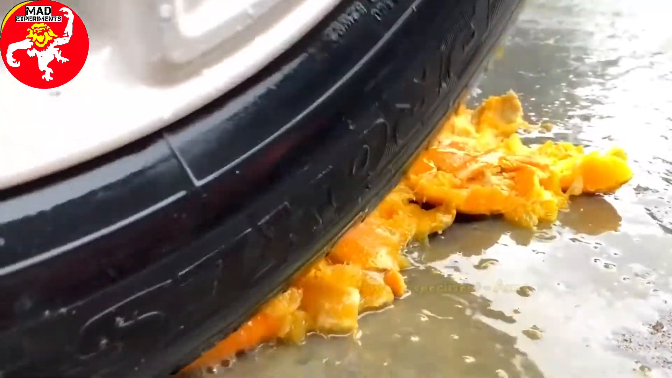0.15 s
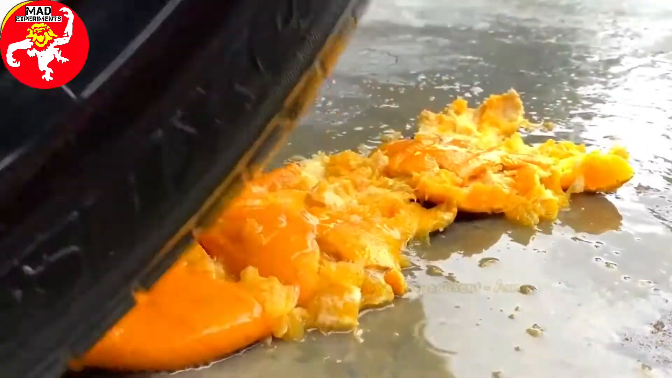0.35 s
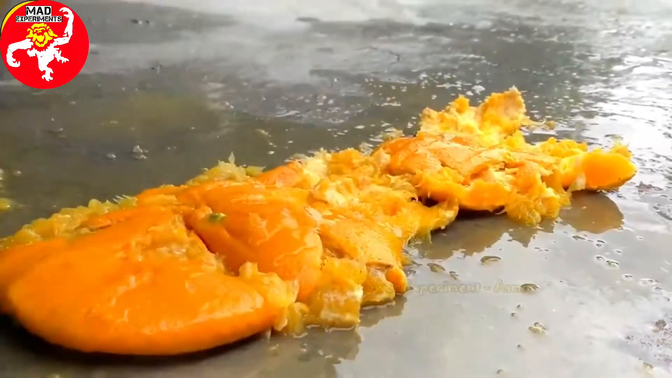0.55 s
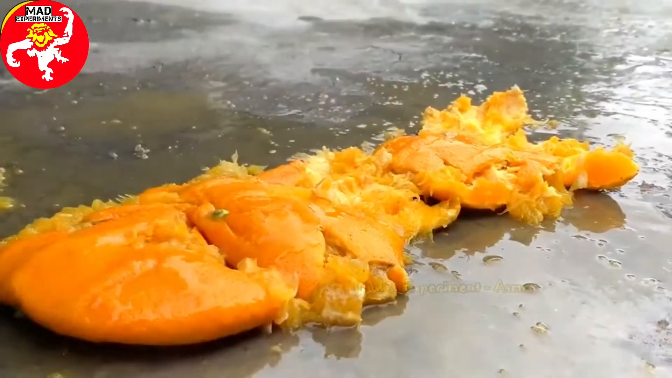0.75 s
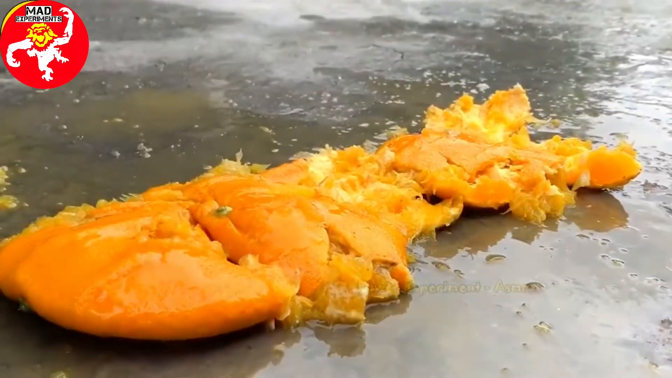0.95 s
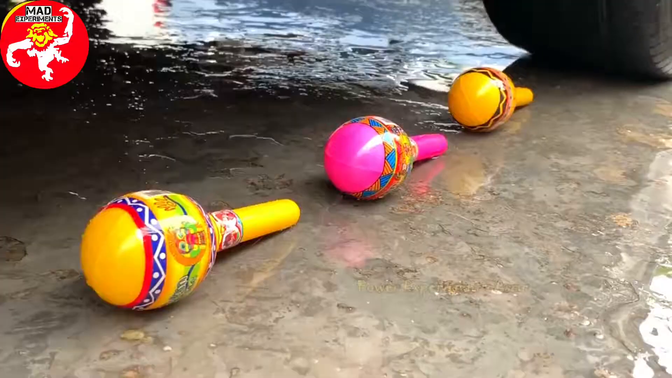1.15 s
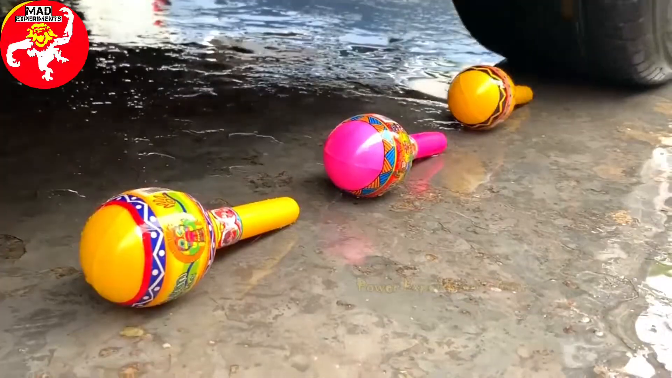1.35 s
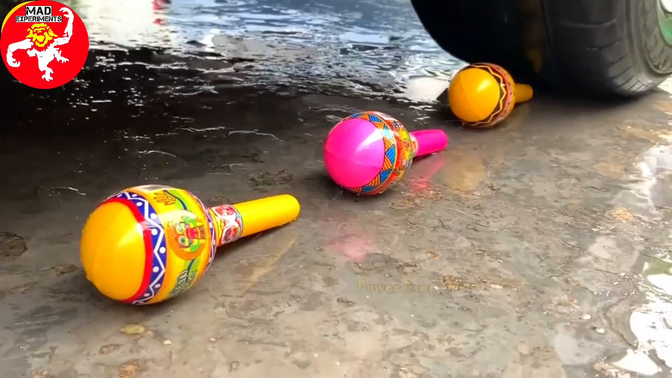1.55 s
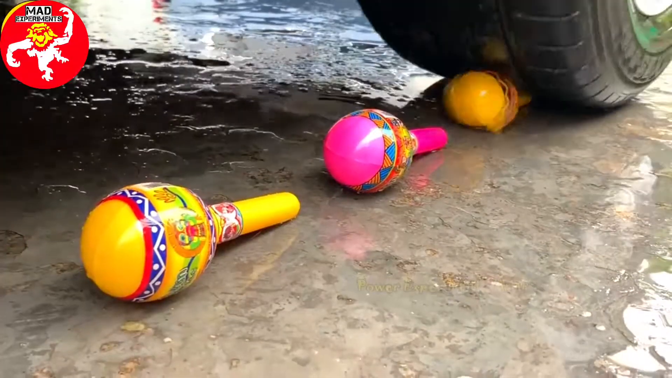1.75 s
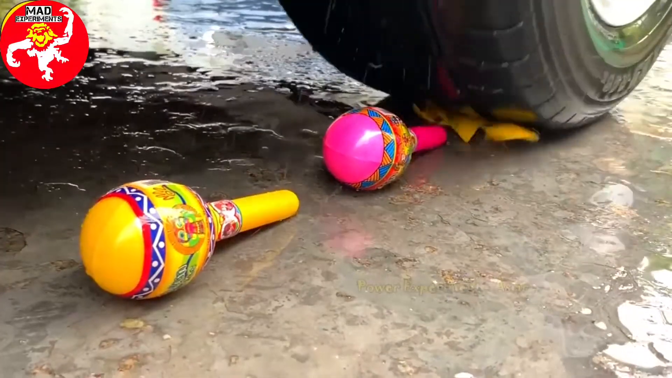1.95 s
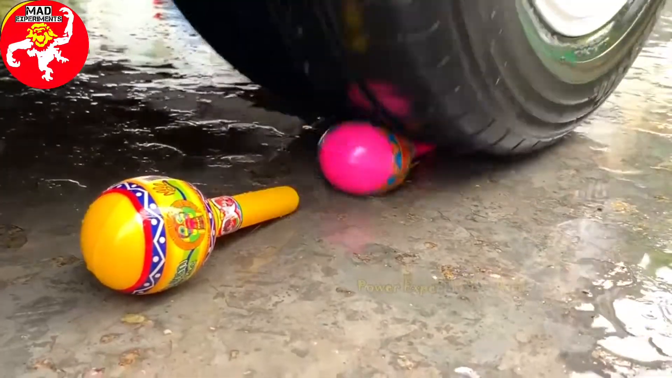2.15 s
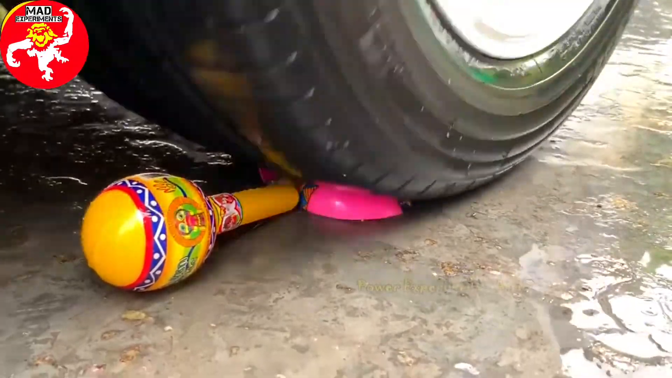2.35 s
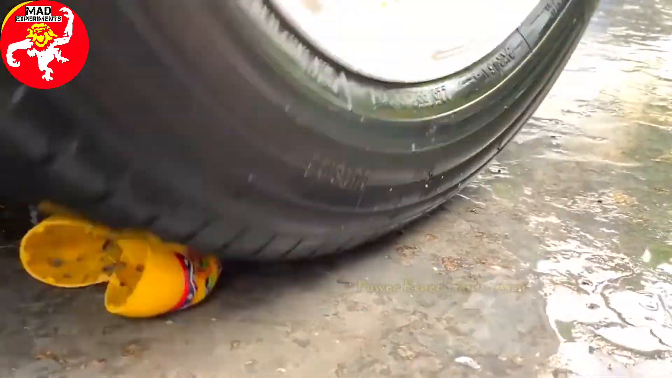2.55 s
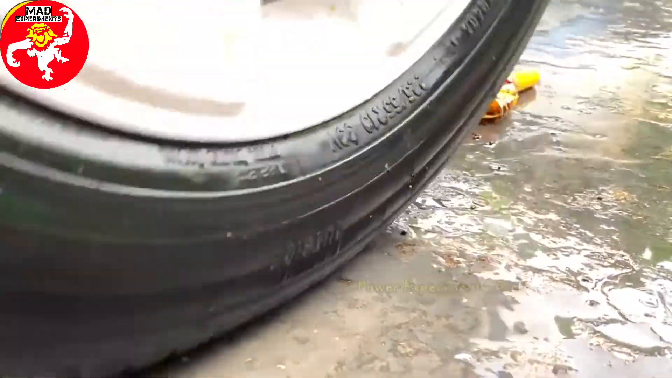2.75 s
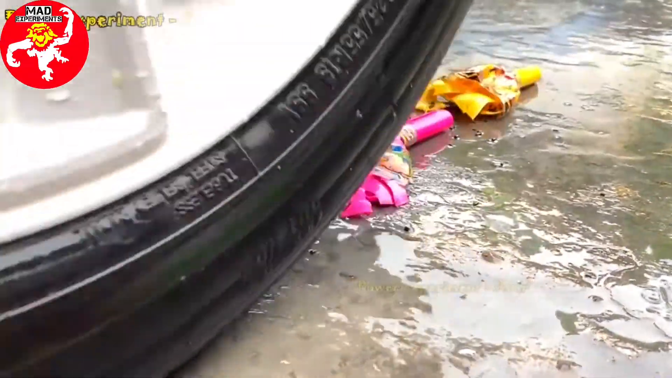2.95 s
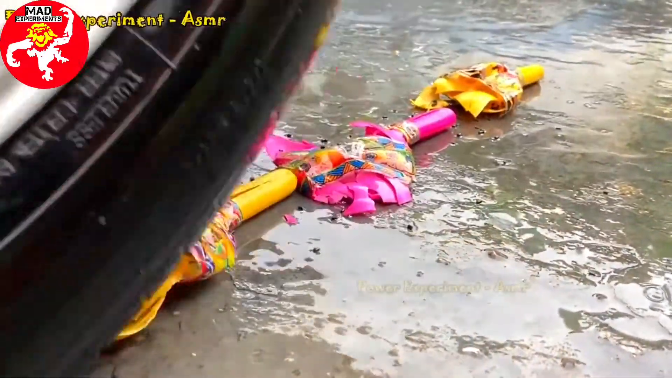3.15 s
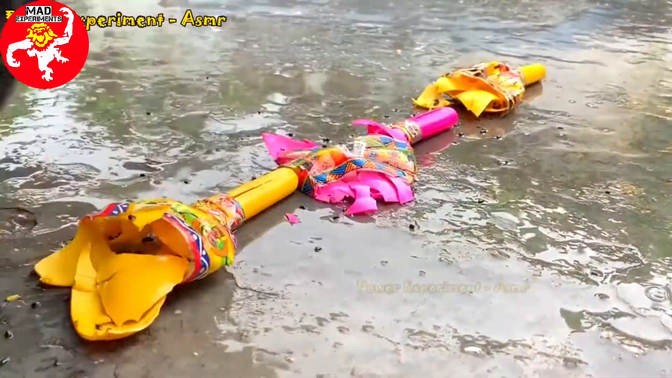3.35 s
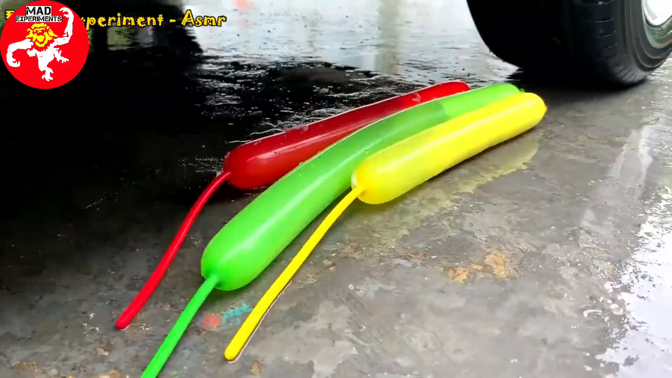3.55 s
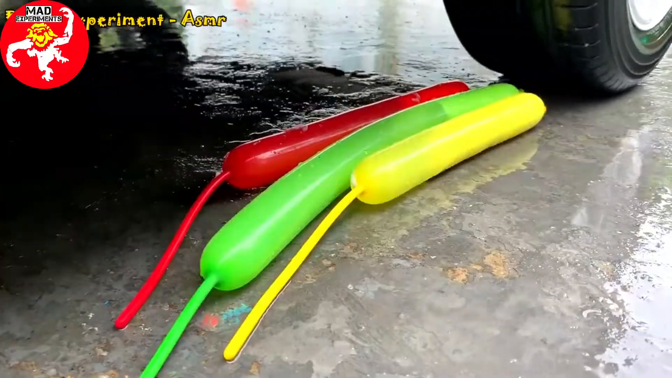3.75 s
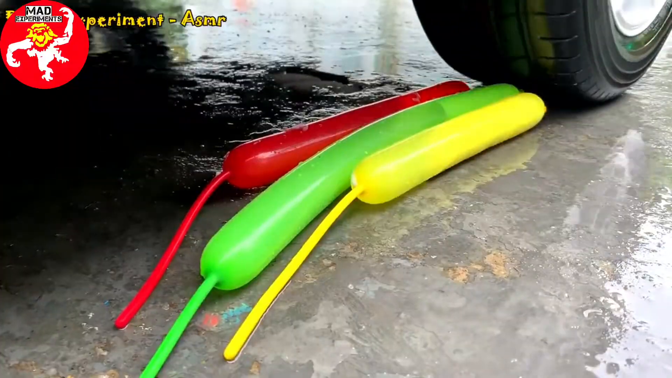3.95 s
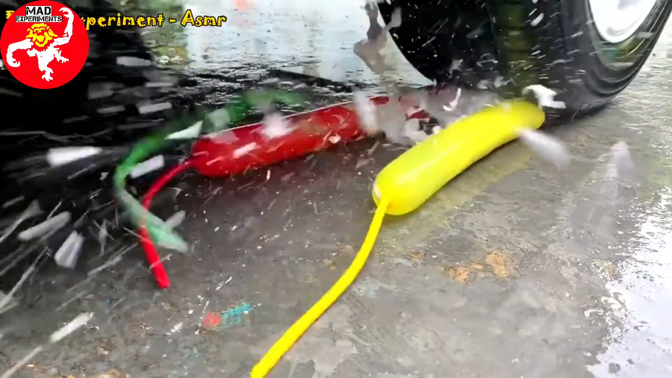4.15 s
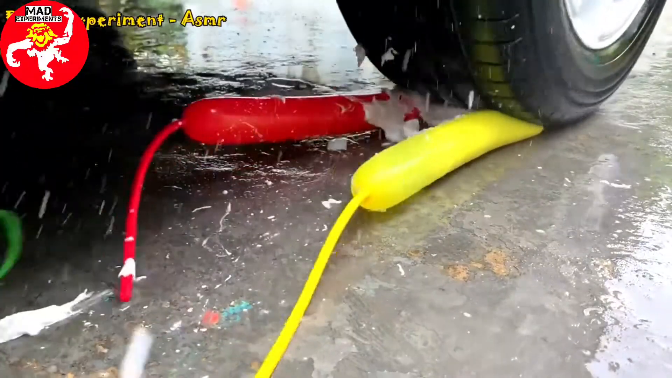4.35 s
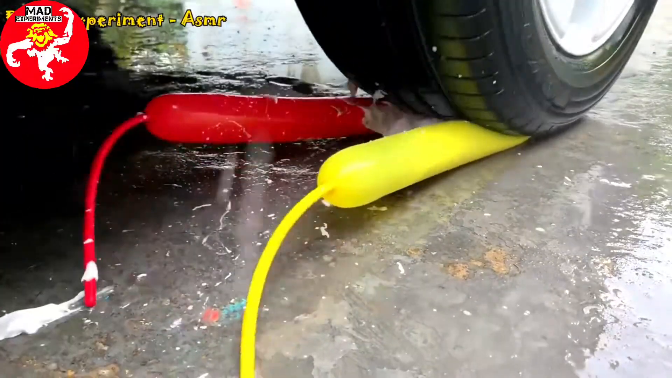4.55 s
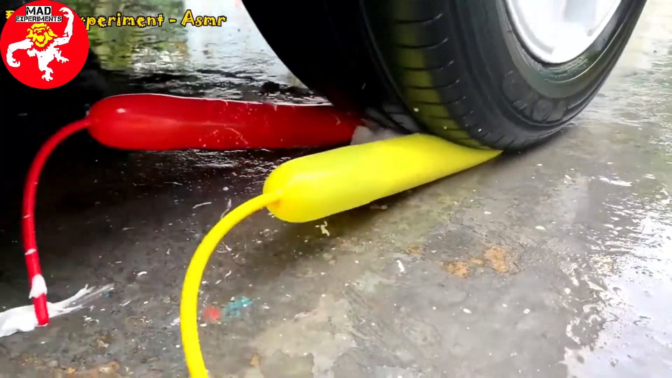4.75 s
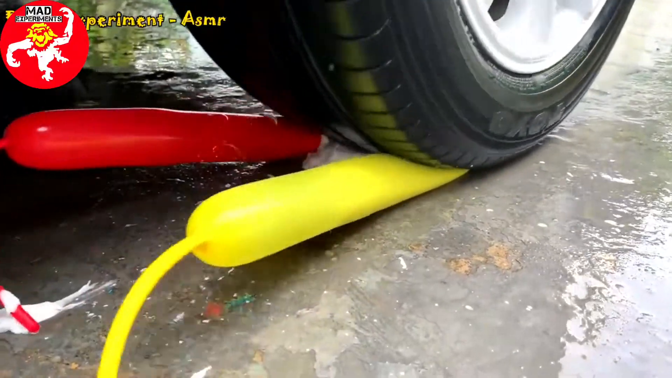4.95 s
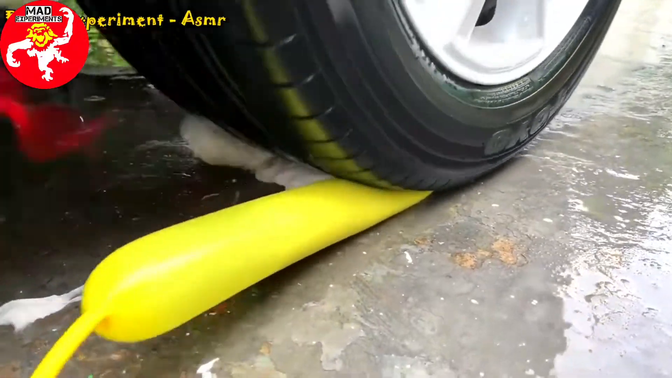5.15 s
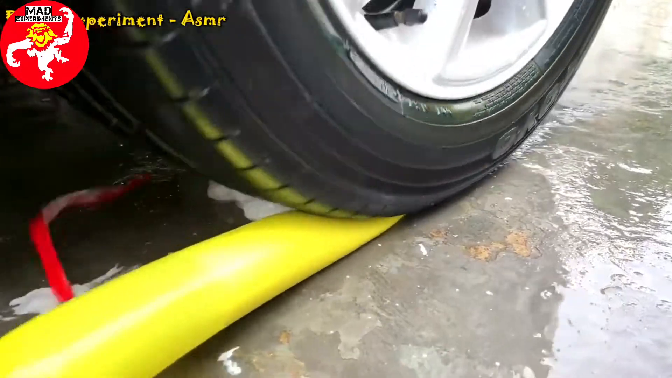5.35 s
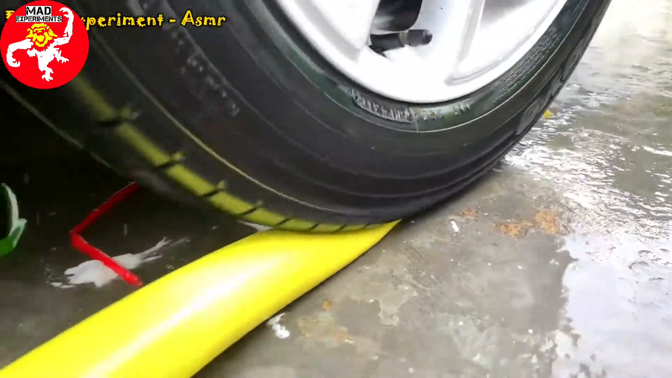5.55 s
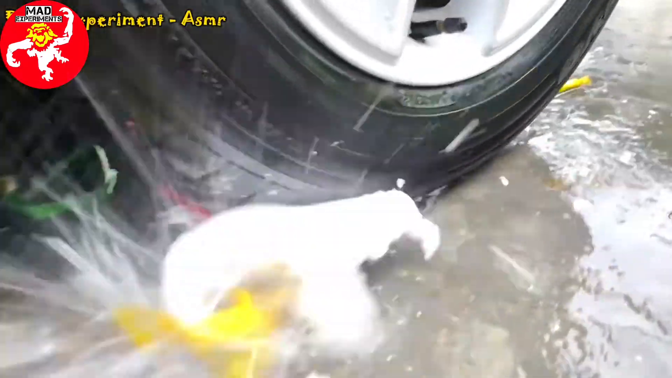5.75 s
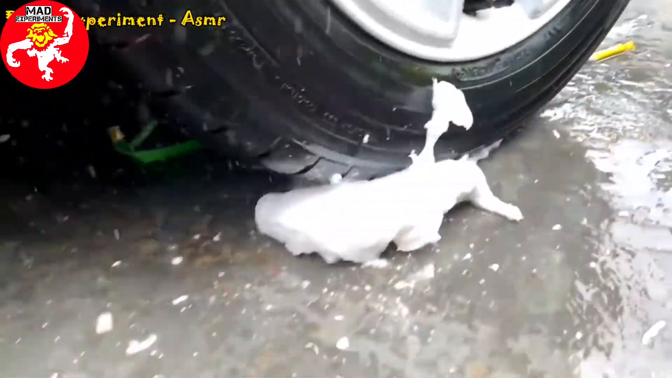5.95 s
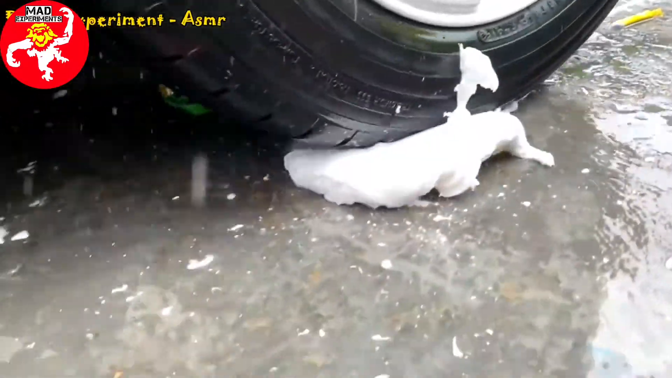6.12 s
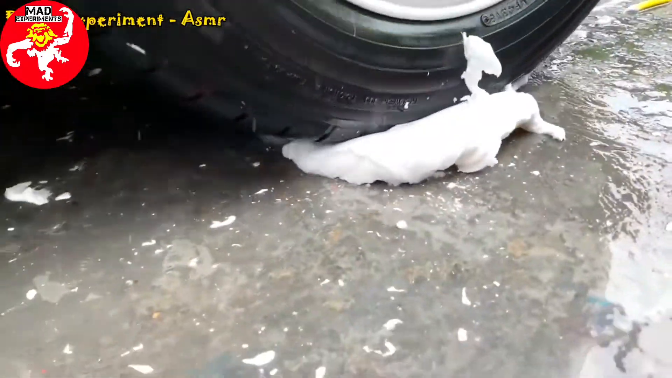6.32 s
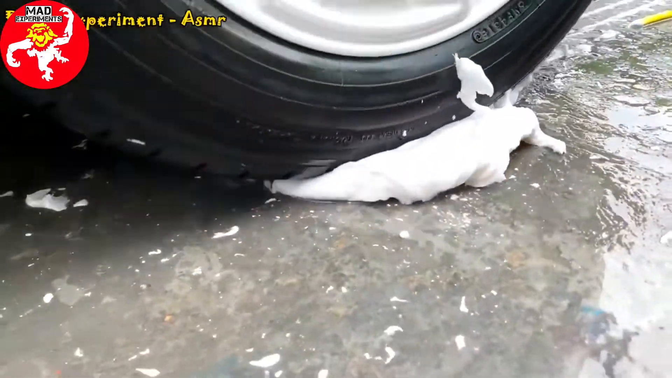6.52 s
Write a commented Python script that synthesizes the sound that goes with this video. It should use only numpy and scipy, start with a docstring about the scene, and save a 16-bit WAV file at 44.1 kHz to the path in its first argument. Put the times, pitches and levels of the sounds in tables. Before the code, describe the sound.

An idling car rolls over things: a wet squelch, then plastic maracas cracking and crunching, then three sharp balloon bursts.

```python
"""Car creeping over an orange, maracas and balloons

A wet concrete yard, a stereo microphone close to the tyre of an idling car. Beside the exhaust the
tread squashes an orange, which squirts and crackles. Then, with the engine heard from in front,
three plastic maracas crack, splinter and ring, and three foam-filled balloons tear, whoop and spray.
The cracks and bursts reflect off the underbody and echo faintly round the yard."""
import sys
import numpy as np
from scipy import signal
from scipy.fft import rfft, irfft, next_fast_len
from scipy.io import wavfile
from scipy.ndimage import uniform_filter1d

SR = 44100
rng = np.random.default_rng(int(sys.argv[2]) if len(sys.argv) > 2 else 0)


def unload_audio(sound):
    """Save the sound as a 16-bit wav file, at the path given as the first command line argument."""
    columns = np.transpose(np.atleast_2d(sound))
    # keep every value between -1 and 1, then stretch to whole-number steps
    steps = np.round(np.clip(columns, -1, 1) * 32767)
    wavfile.write(sys.argv[1], SR, steps.astype(np.int16))


N = 294588
TIME = np.arange(N) / SR
LEAVES_EXHAUST_S = 1.215  # the microphone is beside the tailpipe until here
CRACK_PAN_DB, SHELL_PAN_DB = -1.5, 1.2  # left minus right

# Spectrum of cracking plastic: (frequency [Hz], relative level [dB])
CRACK_SPECTRUM = [(300, -26.5), (900, -9.5), (1700, -4), (2800, 3.5), (4400, 4), (6500, 0.5), (9500, 2),
                  (13500, -3.5), (15500, -24.5)]
# Spectrum of a knock on the hollow shell: (frequency [Hz], relative level [dB])
SHELL_SPECTRUM = [(80, -20.5), (200, -1), (420, -5), (750, 0.5), (1100, -0.5), (1600, -5.5), (3000, -15.5)]
# The tyre bearing down on each maraca: (start [s], end [s], relative splinter level [dB])
MARACA_CRUSHES = [(1.768, 2.04, -21.5), (2.214, 2.384, -20.5), (2.44, 2.729, -16.5)]
# Balloon bursts: (time [s], left minus right [dB], send to the yard [dB], foam [dB], hum change [dB])
BALLOON_BURSTS = [(4.14, -1.4, -28.5, -53.5, -25.5), (5.2, -2.8, -25, -42.5, -3),
                  (5.84, 2, -19.5, -41.5, 1)]


def maraca_snaps(crack_db=-6, knock_db=1, ring_db=2, crazing_db=-9, size=4096):
    """The plastic crazes under strain, a crack runs through it, and the hollow shell rings briefly."""
    # Main snaps: (time [s], relative crack level [dB], relative shell level [dB], shell pitch [Hz])
    main_snaps = [(1.782, 0.5, -14.5, 637), (1.7935, -2, -26.5, 1110), (1.8065, -2, -23.5, 1180),
                  (1.8205, 0.5, -25.5, 1080), (1.8359, 0, -18.5, 493), (1.8424, -3.5, -4, 1052),
                  (1.8648, -0.5, -24, 1110), (1.889, -9.5, -28, 1120), (1.901, -6, -24.5, 1090),
                  (1.934, -6.5, -19, 1330), (1.9605, 2.5, -6.5, 1187), (2, -3, -22, 394),
                  (2.0296, -2.5, -20.5, 1160), (2.072, -18, -22, 656), (2.1466, -3, -5, 616),
                  (2.2087, 0.5, -5.5, 794), (2.2114, -2, -15.5, 590), (2.2298, -1, -20.5, 1110),
                  (2.2376, -9, -16.5, 550), (2.26, -4, -12.5, 904), (2.2677, -2, -7.5, 687),
                  (2.3144, 3, -12, 876), (2.3487, -4, -26, 1080), (2.3708, 3, -10, 1120),
                  (2.4074, -7.5, -18.5, 1370), (2.4166, -5.5, -17, 1090), (2.456, -2, -15, 427),
                  (2.4745, -3, -14, 428), (2.5325, -4.5, -16.5, 1360), (2.543, 1, -11.5, 775),
                  (2.561, -10.5, -20.5, 1120), (2.583, -4.5, -20.5, 1100), (2.616, 6, -9.5, 1097),
                  (2.6499, 4.5, -8, 1150), (2.675, -2.5, -25.5, 790), (2.6978, 1, -16.5, 850),
                  (2.7085, 2.5, -17.5, 1410), (2.7338, -2.5, -22.5, 690), (2.7699, -12.5, -18, 630),
                  (2.7762, -7.5, -28, 440), (2.7914, -7.5, -18.5, 435), (2.8283, -4.5, -10, 447),
                  (2.8623, -6.5, -21.5, 457), (2.888, -10, -17.5, 1080), (2.934, -15.5, -39, 387)]
    lead_s, rise_s, craze_s = .012, .0008, .005
    out, clock = np.zeros((2, N)), np.arange(size) / SR - lead_s
    t = np.maximum(clock, 0)
    crazing = np.exp(-abs(clock - rise_s) / craze_s) * np.minimum(1 + clock / lead_s, 1)
    shape = np.maximum(strike(t, rise_s=.00089, decay_s=.003), amp(crazing_db) * crazing)
    for s, split_db, shell_db, hz in main_snaps + small_snaps():
        crack = amp(split_db + crack_db) * shape * noise(CRACK_SPECTRUM, size, 1.5, ripple_hz=376.3)
        hollow = noise(SHELL_SPECTRUM, size, 1.5, ripple_hz=131)
        knock = amp(shell_db + knock_db) * strike(t, rise_s, decay_s=.005) * hollow
        ring = amp(shell_db + ring_db) * strike(t, rise_s, decay_s=.004) * np.sin(2 * np.pi * hz * t)
        add(out, s - lead_s, pan(CRACK_PAN_DB) * crack + pan(SHELL_PAN_DB) * (knock + ring))
    return out


def small_snaps(count=2, crack_db=-3, shell_db=-19.5, spread_db=4, low_hz=450, high_hz=1400):
    """Rows for a few extra snaps at random moments while each maraca is under the tyre."""
    rows = []
    for start, end, _ in MARACA_CRUSHES:
        for when, weakness, pitch in rng.random((count, 3)):
            loss_db = spread_db * weakness
            hz = low_hz + pitch * (high_hz - low_hz)
            rows.append((start + when * (end - start), crack_db - loss_db, shell_db - loss_db, hz))
    return rows


def splinters(level_db=-1, shell_db=-4):
    """Many tiny fractures of random size between the big snaps."""
    fractures = crackle(per_s=400, spread_db=4.5, decay_s=.0031)
    plastic = noise(CRACK_SPECTRUM, N) + amp(shell_db) * noise(SHELL_SPECTRUM, N)
    return tread_pressure() * amp(level_db) * fractures * plastic


def tread_pressure(bite_s=.005, ease_db_per_s=-18.5, release_s=.006, settle_db=-12.5,
                   settle_db_per_s=-66.5):
    """The tread bites into each maraca, eases as the shell gives way and lets go; the pieces settle."""
    total = np.zeros(N)
    for start, end, db in MARACA_CRUSHES:
        bite = np.clip((TIME - start) / bite_s + 1, 0, 1)
        held, after = np.clip(TIME - start, 0, end - start), np.maximum(TIME - end, 0)
        release = np.maximum(np.exp(-after / release_s), amp(settle_db + settle_db_per_s * after))
        total = np.maximum(total, bite * amp(db + ease_db_per_s * held) * release)
    return total


def ringing(breaks):
    """Tyre cavity and shells ring in sympathy with each break."""
    # The air in the tyre first, then the shells: (frequency [Hz], t60 [s], gain at resonance [dB])
    modes = [(191.3, .3, 12), (404, 0.023, -7.5), (1120, .035, -19.5), (2790, .03, -7.5), (4460, 0.029, -5),
             (6180, 0.0067, -6.5)]
    t = TIME[:SR // 2]
    response = sum(amp(db - 60 * t / t60) * np.cos(2 * np.pi * hz * t) * 2 * np.log(1000) / (t60 * SR)
                   for hz, t60, db in modes)
    return signal.fftconvolve(breaks, response[None], axes=1)[:, :N]


def balloons(release_s=.0023, squeal_db=-2, size=4096):
    """The rubber rips with a swelling rasp, then the wall snaps back and the pitch plunges."""
    # Rubber tearing: (start [s], end [s], final level [dB], rise along the tear [dB], squeal [Hz])
    tears = [(4.118, 4.135, -20.5, 17, 1348), (4.135, 4.142, -11, 9.5, 1237),
             (5.181, 5.187, -21.5, 13, 1877), (5.185, 5.196, -9.5, 10.5, 1825),
             (5.832, 5.849, -20.5, 15.5, 2606)]
    # Rasp of the tear: (frequency [Hz], relative level [dB])
    rip_spectrum = [(100, -28.5), (400, 5), (1750, 0.5), (2500, -11.5), (4000, 0), (6500, -3),
                    (8000, -12.5), (10000, -17), (15000, -26.5)]
    # Walls collapsing: (time [s], level [dB], first pitch [Hz], growth of the period [s/s], swell [s])
    whoops = [(4.1315, -4, 898, 0.36, 0.002), (4.1435, -1, 1536, 0.76, 0.00078),
              (5.187, -18, 1007, 0.23, 0.0047), (5.1977, -2, 2400, 1, 0.0012),
              (5.8424, -2.5, 1293, 0.56, 0.0013)]
    out, t = np.zeros((2, N)), TIME[:size]
    for start, end, db, rise_db, hz in tears:
        length = max(end - start, .002)
        release = np.exp(-np.maximum(t - length, 0) / release_s)
        shape = amp(db + rise_db * np.minimum(t / length - 1, 0)) * release
        slip_hz = hz * (1 + .18 * unit(uniform_filter1d(rng.standard_normal(size), 60)))
        squeal = amp(squeal_db) * np.sin(2 * np.pi * np.cumsum(slip_hz) / SR)
        add(out, start, shape * (squeal + noise(rip_spectrum, size, 5, ripple_hz=398)))
    for s, db, hz, growth, swell_s in whoops:
        cycles = np.log1p(growth * hz * t) / growth
        add(out, s, amp(db) * swell(t, swell_s) * np.sin(2 * np.pi * cycles))
    return out


def foam(rise_s=.01, decay_s=.078):
    """Each burst flings foam, which patters down and thins out."""
    # Foam patter with a hollow ring near 640 Hz after each burst: (frequency [Hz], relative level [dB])
    patter_spectrum = [(200, -18.5), (450, 1), (640, 14.5), (900, 2), (1600, 3.5), (3400, -6.5),
                       (7000, -18.5), (9000, -6), (14000, -21.5)]
    drops = patter(N, per_s=900, decay_s=.002)
    flung = sum(amp(db) * strike(np.maximum(TIME - s, 0), rise_s, decay_s)
                for s, _, _, db, _ in BALLOON_BURSTS)
    return flung * drops * noise(patter_spectrum, N)


def thuds(size=8192):
    """The tyre drops or air escapes: a few cycles of low pressure."""
    # Low pulses: (time [s], level [dB], pitch [Hz], swell [s])
    pulses = [(1.846, -25, 166, 0.0068), (2.47, -29.5, 148, 0.0046), (2.621, -24.5, 107.2, 0.0072),
              (2.635, -21, 79.74, 0.0063), (2.83, -36.5, 122, 0.01), (4.145, -11, 70, 0.0021),
              (5.205, -12.5, 76.5, .004), (5.843, -26.5, 84, 0.0028)]
    out, t = np.zeros((2, N)), TIME[:size]
    for s, db, hz, swell_s in pulses:
        add(out, s, amp(db) * swell(t, swell_s) * np.sin(2 * np.pi * hz * t))
    return out


def tread_noises(size=16384):
    """Wet squelches, a rubbery rub and a short knock under the tread: grainy noise around one pitch."""
    # Squelches, rub and knock: (time [s], level [dB], pitch [Hz], swell [s])
    events = [(0.005, -36, 2040, 0.042), (0.025, -32.5, 4100, 0.028), (0.129, -28, 1150, 0.019),
              (0.171, -40, 7370, 0.02), (2.995, -52, 3900, 0.029), (3.07, -49.5, 1390, 0.016),
              (4.329, -48, 840, 0.064), (4.87, -47, 1240, 0.065), (5.049, -30.5, 910, 0.005),
              (5.37, -48, 480, 0.027), (5.388, -52.5, 3940, 0.024), (5.555, -51, 1208, 0.0071),
              (5.75, -61.5, 1100, 0.029)]
    out, t = np.zeros((2, N)), TIME[:size]
    for s, db, hz, swell_s in events:
        texture = patter(size, per_s=2200, decay_s=.003)
        colour = [(hz / 4, -28), (hz * .8, -11), (hz, 0),
                  (hz * 1.25, -11), (hz * 4, -32), (hz * 12, -55)]
        add(out, s, amp(db) * swell(t, swell_s) * texture * noise(colour, size))
    return out


def wet_ticks(level_db=-10, size=2048):
    """Pulp, grit and foam give small wet clicks, each brightest around its own pitch."""
    # Clicks: (time [s], relative level [dB], pitch [Hz])
    clicks = [(0.0632, -14, 4200), (0.2263, -18, 8300), (0.4804, -16, 7800), (0.6155, -24.5, 6300),
              (1.0546, -20, 8100), (1.1034, -23, 8350), (1.2136, -17.5, 3360), (3.032, -33, 3930),
              (3.0842, -36, 6230), (3.0936, -28.5, 2900), (3.115, -34, 8600), (3.352, -53, 3880),
              (3.4024, -44.5, 8400), (5.053, -27.5, 3080), (5.4135, -24.5, 2680), (5.5349, -24, 3400)]
    out = np.zeros((2, N))
    shape = strike(TIME[:size], rise_s=.00027, decay_s=.0044)
    for s, db, hz in clicks:
        colour = [(300, -9), (hz * .8, -8), (hz, 0), (hz * 1.2, -8), (hz * 2.5, -13), (hz * 5, -40)]
        add(out, s, amp(db + level_db) * shape * noise(colour, size))
    return out


def orange_pulp(relative_db=-12):
    """Sparse tiny ticks, just under the engine hiss, as the cells of the squashed orange give way."""
    # Crackling pulp: (frequency [Hz], relative level [dB])
    pulp_spectrum = [(600, -18.5), (1500, -6.5), (4000, -1), (6000, -1.5), (8000, 1), (13000, -2.5)]
    cells = crackle(per_s=60, spread_db=4, decay_s=.0015)
    *_, hiss_db = engine_levels()
    return (TIME < LEAVES_EXHAUST_S) * amp(hiss_db + relative_db) * cells * noise(pulp_spectrum, N)


def engine(uneven=.22, rumble_throb=.19, hiss_throb=.15):
    """Slightly uneven firings make the hum and throb through the rumble and hiss of the engine bay."""
    # Idle speed: (time [s], firing rate [Hz])
    idle_speed = [(0, 23.3), (1.2, 23.3), (1.25, 23), (1.75, 22.4), (3.5, 23.1), (4.1, 22.9), (4.4, 22.4),
                  (4.92, 21.8), (5.37, 21.2), (5.8, 20.6), (6.3, 19.6)]
    # Engine rumble: (frequency [Hz], relative level [dB])
    rumble_spectrum = [(25, -21.5), (80, 4.5), (190, 1.5), (270, -5.5), (450, -6), (620, -9), (850, -14),
                       (1300, -20), (2000, -24), (4000, -51.5)]
    firing_hz, = curve(idle_speed)
    firings = np.cumsum(firing_hz) / SR
    strength = 1 + uneven * np.interp(firings, np.arange(256), rng.standard_normal(size=256))
    beat = np.cos(2 * np.pi * firings)
    near = uniform_filter1d(1. * (TIME < LEAVES_EXHAUST_S), size=200)  # 1 at the exhaust, 0 in front
    hum_db, rumble_db, hiss_db = engine_levels()
    tones = amp(hum_db) * exhaust_hum(firings, near) + tailpipe_drone(firings)
    rumble = amp(rumble_db + 2) * (1 + rumble_throb * beat) * noise(rumble_spectrum, N, 2, ripple_hz=31.3)
    hiss = amp(hiss_db) * (1 + hiss_throb * beat) * bay_hiss(near)
    return (strength * tones + rumble + hiss) * pan(-1.4)


def exhaust_hum(firings, near, pipe_lag_cycles=.414):
    """Firing pulses heard beside the pipe, then from in front, changing colour as the idle slows."""
    # Hum beside the exhaust: (multiple of the firing rate, relative level [dB])
    near_orders = [(1, 3.5), (2, -5), (3, -0.5), (4, -16.5), (5, -3), (6, -20.5), (7, -14), (8, -14),
                   (9, -52), (10, -23), (11, -34), (12, -38), (13, -41.5)]
    # Hum ahead of the car: (multiple of the firing rate, relative level [dB])
    front_orders = [(1, -18), (2, -14), (3, 2.5), (4, -8), (5, -0.5), (6, -5.5), (7, -15), (8, -4.5),
                    (9, -19), (10, -26.5), (11, -34), (12, -24), (13, -31), (14, -21)]
    # Hum ahead of the car at the slower idle: (multiple of the firing rate, relative level [dB])
    slow_orders = [(1, -8.5), (2, -7.5), (3, 2), (4, -3.5), (5, 5), (6, -3.5), (7, -12.5), (8, -4.5),
                   (9, -20), (10, -26), (11, -32), (12, -31.5), (13, -28), (14, -27.5)]
    slowed = np.clip((TIME - 4.2) / .19, 0, 1)
    ahead = (1 - slowed) * pipe_pulses(front_orders, firings) + slowed * pipe_pulses(slow_orders, firings)
    beside = -pipe_pulses(near_orders, firings - pipe_lag_cycles)
    return near * beside + (1 - near) * ahead


def pipe_pulses(orders, firings, size=128):
    """One pressure pulse a firing: harmonics with the phases of a causal pipe resonance."""
    multiples, levels = np.transpose(orders)
    index = np.arange(size)
    mirrored_db = np.interp(np.minimum(index, size - index), multiples, levels)
    phase = -signal.hilbert(np.log(amp(mirrored_db))).imag
    pulses = sum(amp(db) * np.cos(2 * np.pi * k * firings + phase[k]) for k, db in enumerate(levels, 1))
    return pulses / np.sqrt(np.sum(amp(levels[1:]) ** 2) / 2)  # overtones at rms 1


def tailpipe_drone(firings):
    """The pipe drones on high harmonics of the firing rate while the microphone is beside it."""
    # Drone harmonics: (multiple of the firing rate, relative level [dB])
    orders = [(14, -3), (15, -9), (16, 3), (17, -10), (18, -11), (20, -19), (21, -18)]
    # Swell and fade of the drone: (time [s], level [dB])
    envelope = [(0, -46), (.25, -43.5), (.55, -38.5), (.95, -34.5), (1.2, -40.5), (1.23, -100)]
    drone = sum(amp(db) * np.cos(2 * np.pi * round(k) * firings) for k, db in orders)
    return amp(curve(envelope)[0]) * unit(drone)


def bay_hiss(near):
    """Engine hiss from both positions; in front, the resonances of the bay add a whirr."""
    # Engine bay resonances: (frequency [Hz], width [Hz], relative level [dB])
    resonances = [(554, 66, -8.5), (1430, 31, -6.5), (1950, 27, -11), (2510, 190, -15), (3000, 33, -12.5),
                  (3320, 99, -11)]
    # Hiss beside the exhaust: (frequency [Hz], relative level [dB])
    near_spectrum = [(600, -13), (1300, 1.5), (2000, -5.5), (3300, -4), (4500, -8.5), (7000, -11),
                     (9000, -9.5), (14000, -18.5)]
    # Hiss ahead of the car: (frequency [Hz], relative level [dB])
    front_spectrum = [(600, -28.5), (1400, -2), (2300, -2.5), (3400, -4), (3900, -5.5), (7000, -13),
                      (9000, -8.5), (14000, -28)]
    hz = np.arange(20, SR // 2, 10)
    peaks = sum(amp(db) / (1 + (2 * (hz - centre) / width) ** 2) for centre, width, db in resonances)
    whirr = amp(-5) * noise(np.column_stack([hz, 20 * np.log10(peaks)]), N)
    beside = amp(1) * noise(near_spectrum, N, -1, ripple_hz=154)
    ahead = amp(-1) * noise(front_spectrum, N, 3.5, ripple_hz=116.1) + whirr
    return near * beside + (1 - near) * ahead


def engine_levels(fall_s=.09, recover_s=.24, rumble_share=.56, hiss_share=.3):
    """Hum, rumble and hiss in dB: they step, drift, and dip briefly after the first two bursts."""
    # Relative engine levels by stretch: (start [s], hum [dB], rumble [dB], hiss [dB], drift [dB/s])
    stretches = [(0, -20.5, -32.5, -41.5, -0.73), (1.217, -28, -37.5, -44, -1), (1.8, -39, -40, -45.5, -7),
                 (2.92, -51.5, -61.5, -68.5, -8), (3.506, -31.5, -42, -48, 2), (4.14, -36, -46, -54.5, 2.5),
                 (5.2, -48, -61, -63, -1), (5.849, -59, -67, -75.5, -2.5)]
    rows = np.array(stretches)
    start, *levels, drift = rows[np.searchsorted(rows[1:, 0], TIME)].T
    hum, rumble, hiss = uniform_filter1d(np.array(levels) + drift * (TIME - start), size=900)
    dip = sum(db * np.interp(TIME - s, [0, fall_s, fall_s + recover_s], [0, 1, 0])
              for s, *_, db in BALLOON_BURSTS)
    return hum + dip, rumble + rumble_share * dip, hiss + hiss_share * dip


def echo(x, decay_times, delay_s=.0039):
    """Dense reflections, each band dying at its own speed: (frequency [Hz], t60 [s])."""
    colour = [(100, 5), (600, -8), (2500, -2), (6000, -4), (12000, -8)]
    hz, t, bands = signal.stft(noise(colour, SR), SR, nperseg=256)
    decay = amp(-60 * t / at_hz(decay_times, hz)[:, None])
    tail = signal.istft(bands * decay, SR, nperseg=256)[1][:, :SR]
    tail *= np.clip(TIME[:SR] / delay_s - 1, 0, 1)
    return signal.fftconvolve(x, tail / np.linalg.norm(tail[0]), axes=1)[:, :N]


def noise(spectrum, size, ripple_db=0, ripple_hz=300):
    """Coloured noise of rms 1 at both microphone ports, with random resonances about ripple_hz wide."""
    # Likeness of the two ports: (frequency [Hz], coherence [0-1])
    port_coherence = [(100, 0.69), (700, 0.76), (1500, 0.39), (3000, 0.2), (6000, 0.27), (13000, 0.17)]
    # How far the left port leads: (frequency [Hz], phase [rad])
    left_lead = [(0, -4.5), (1120, 1.1), (2760, 6.5), (4130, 7.5), (6200, 12), (8100, 18.5), (10200, 13),
                 (10600, 22), (11400, 0), (12100, 12.5), (13100, 7), (13800, 13), (14600, 5.5),
                 (15200, -13.5)]
    hz = np.fft.rfftfreq(size, 1 / SR)
    left, other = rng.standard_normal((2, len(hz))) + 1j * rng.standard_normal((2, len(hz)))
    same = np.clip(at_hz(port_coherence, hz), 0, 1)
    right = (same * left + np.sqrt(1 - same ** 2) * other) * np.exp(-1j * at_hz(left_lead, hz))
    ripple = ripple_db * np.interp(hz / ripple_hz, np.arange(512), rng.standard_normal(size=512))
    return unit(irfft(np.array([left, right]) * amp(at_hz(spectrum, hz) + ripple), size))


def crackle(per_s, spread_db, decay_s):
    """Envelope of random fractures, a few much larger than the rest."""
    return grains(amp(spread_db * np.minimum(rng.exponential(1, N), 4)), per_s, decay_s)


def patter(size, per_s, decay_s):
    """Envelope of a fine random patter."""
    return grains(rng.exponential(1, size), per_s, decay_s)


def grains(sizes, per_s, decay_s):
    """Decaying impulses of the given sizes at random moments, at rms 1."""
    impulses = sizes * (rng.random(len(sizes)) < per_s / SR)
    return unit(signal.lfilter([1], [1, -np.exp(-1 / (decay_s * SR))], impulses))


def strike(t, rise_s, decay_s):
    """A quick rise and exponential fall, peak 1."""
    shape = (1 - np.exp(-(t / rise_s) ** 2)) * np.exp(-t / decay_s)
    return shape / shape.max()


def swell(t, peak_s):
    """Rises to 1 at peak_s and dies away."""
    return t / peak_s * np.exp(1 - t / peak_s)


def amp(db):
    """Decibels to gain."""
    return 10 ** (np.asarray(db) / 20)


def pan(db):
    """Gains of the two ports for a left-minus-right level."""
    return amp([[db / 2], [-db / 2]])


def unit(x):
    """Scales to rms 1."""
    return x / np.sqrt(np.mean(x ** 2) + 1e-20)


def curve(rows):
    """Every column of a timed table, sample by sample."""
    s, *columns = np.transpose(rows)
    return [np.interp(TIME, s, c) for c in columns]


def at_hz(points, hz):
    """Reads a spectrum on a log-frequency axis."""
    f, value = np.transpose(points)
    return np.interp(np.log(hz + 1), np.log(f + 1), value)


def add(mix, s, sound):
    """Mixes a sound in at time s."""
    part = mix[:, max(round(s * SR), 0):][:, :sound.shape[-1]]
    part += sound[..., :part.shape[1]]


def scene():
    """Close sounds at the tyre, quick reflections from under the car, and the faint yard beyond."""
    # Echo of the yard: (frequency [Hz], t60 [s])
    yard_decay = [(100, 0.13), (500, 0.87), (2000, 0.92), (6000, 0.57), (14000, 0.54)]
    breaks = maraca_snaps() + pan(CRACK_PAN_DB) * splinters()
    crunch = amp(-2.5) * breaks + ringing(breaks)
    pan_db, yard_db, *_ = curve(BALLOON_BURSTS)
    pops = balloons() * amp([pan_db / 2, -pan_db / 2])
    underbody = echo(amp(-13) * crunch + amp(-15.5) * pops, [(200, .11), (1500, .15), (10000, .079)])
    yard = echo(amp(-31) * crunch + amp(yard_db) * pops, yard_decay)
    close = engine() + crunch + thuds() + tread_noises() + wet_ticks() + orange_pulp() + pops + foam()
    return close + underbody + yard


def record(dry):
    """The close microphone colours the sound, clips any peak over full scale and cuts the top treble."""
    # Microphone response: (frequency [Hz], gain [dB])
    mic_response = [(6400, 2), (7600, 2), (8200, 6.5), (9300, 3.5), (10600, 1), (11600, -9.5), (12700, 3.5),
                    (14000, -7)]
    size = next_fast_len(N + SR)
    gain = amp(at_hz(mic_response, np.fft.rfftfreq(size, 1 / SR)))
    coloured = irfft(rfft(dry, size) * gain, size)[:, :N]
    lowpass = signal.firwin(255, cutoff=15700, window=("kaiser", 8), fs=SR)
    return signal.oaconvolve(np.clip(coloured, -1, 1), lowpass[None], "same")


dry = scene()
out = record(dry)
unload_audio(out)
```